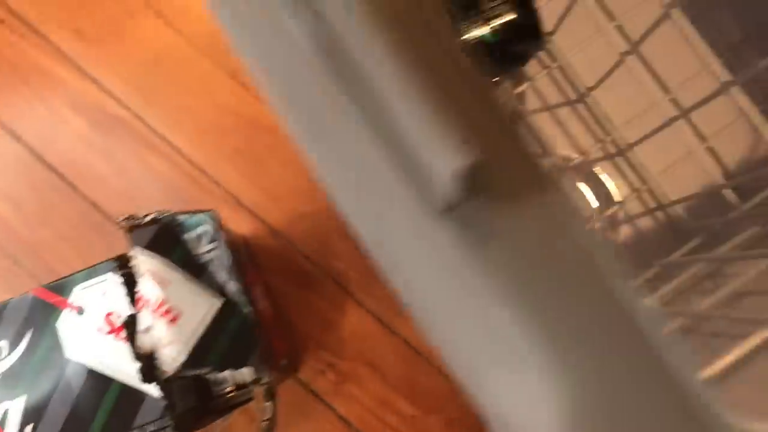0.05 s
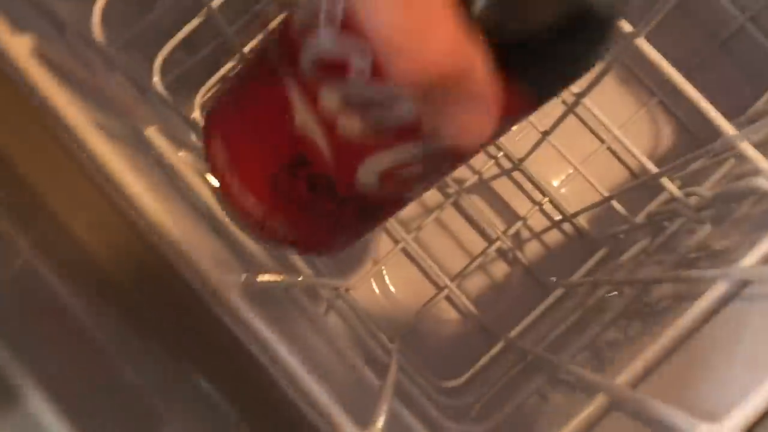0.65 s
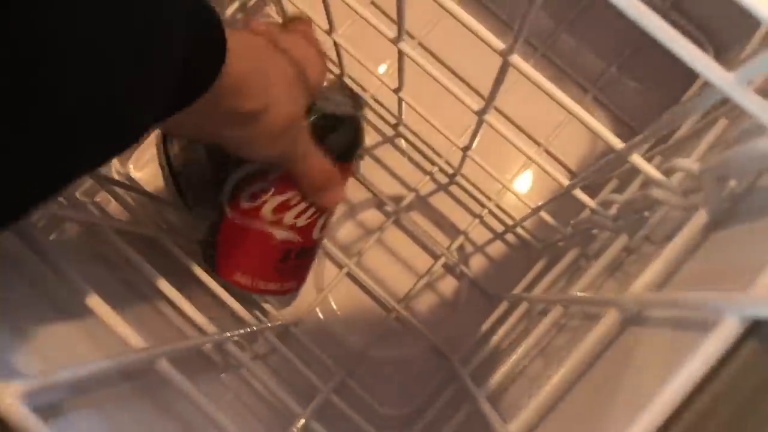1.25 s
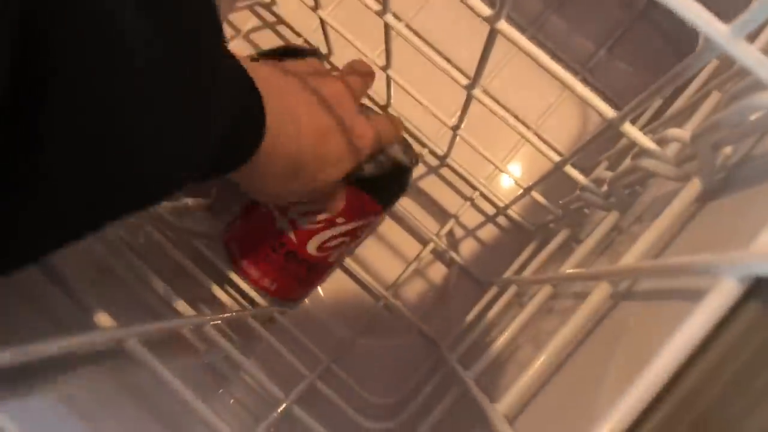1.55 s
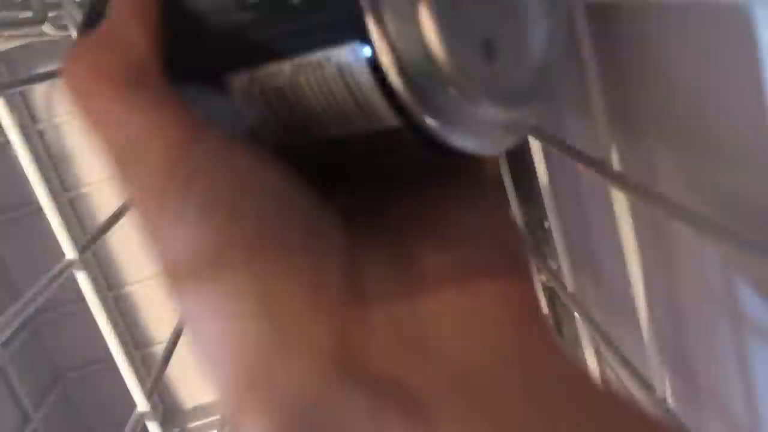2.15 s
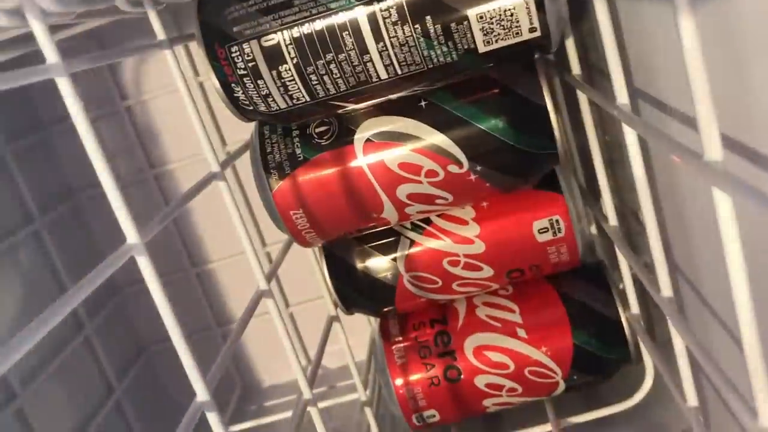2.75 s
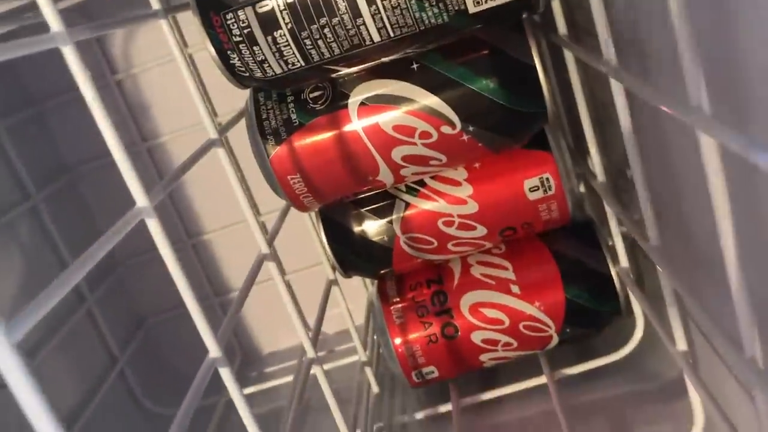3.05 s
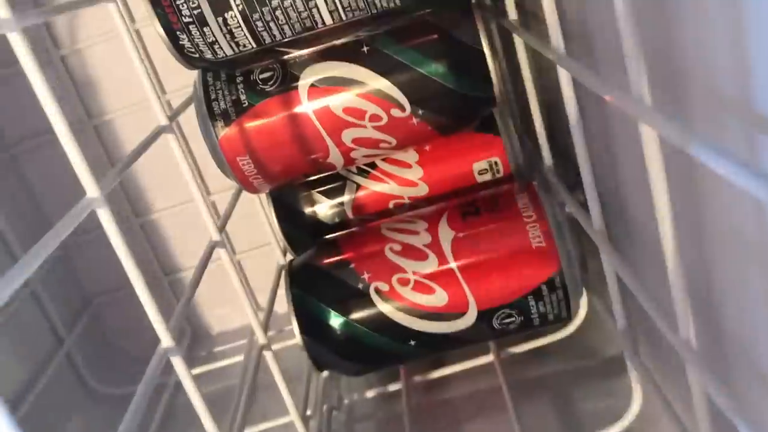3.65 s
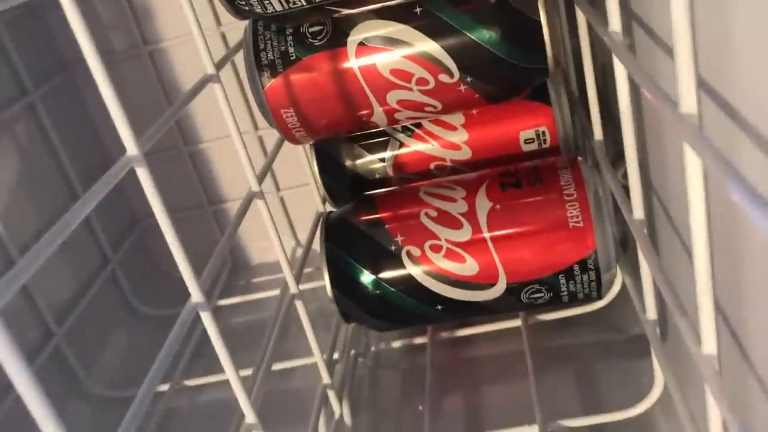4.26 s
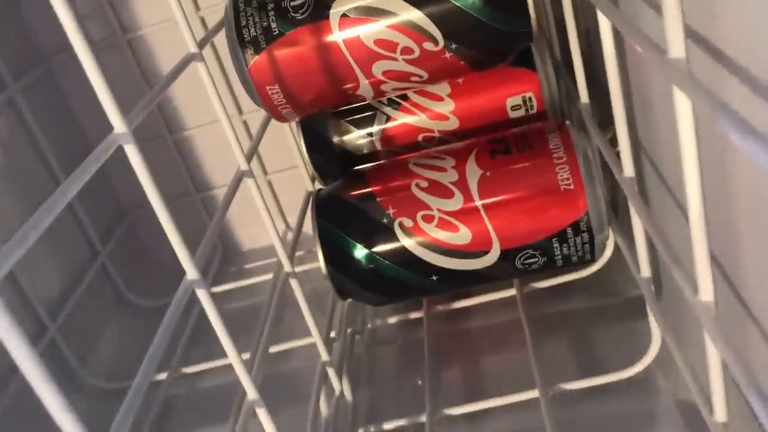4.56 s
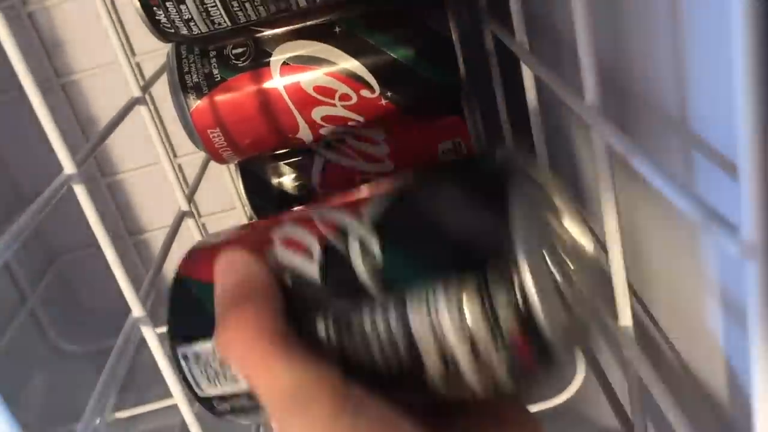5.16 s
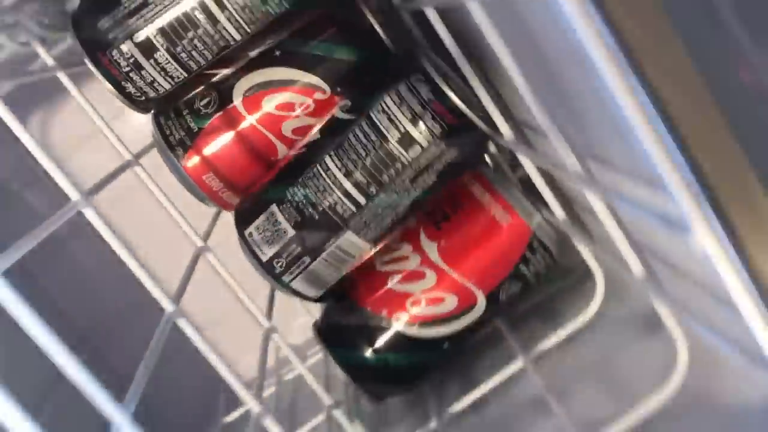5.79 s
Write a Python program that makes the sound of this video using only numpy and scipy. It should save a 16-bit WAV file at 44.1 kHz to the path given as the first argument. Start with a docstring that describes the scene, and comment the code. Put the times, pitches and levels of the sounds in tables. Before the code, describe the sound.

A drawer thumps open and rumbles with a rattling wire basket, then full cans clank in, between bumps from a cardboard carton.

```python
"""Kitchen, a phone microphone close to a fridge drawer being loaded with full soda cans.
A few faint squeaks, then the drawer thumps open and rumbles along its runners, its wire basket rattling.
An abrupt edit cut just before 2 s jumps from the rolling drawer to can loading over a faint fridge hum.
A can clatters onto the others, a hand rummages in a cardboard carton, a second can follows at 3.3 s,
then more rummaging and the last can at 5.1 s."""
import sys
import numpy as np
from scipy import signal
from scipy.fft import rfft, irfft
from scipy.io import wavfile
from scipy.ndimage import uniform_filter1d

SR = 44100
rng = np.random.default_rng(int(sys.argv[2]) if len(sys.argv) > 2 else 0)


def transcribe(u):
    """Save the signal u as a 16-bit wav file named by the first command-line argument.

    u: samples, shape (n,) or (channels, n), limited to [-1, 1]; the rate is SR.
    q: integer samples, one column per channel.
    """
    v = np.clip(np.atleast_2d(u).T, -1, 1)
    q = np.round(v * 32767).astype(np.int16)
    wavfile.write(sys.argv[1], SR, q)


N = 265702
TIME = np.arange(N) / SR


def amp(db):
    """Decibels to gain."""
    return 10 ** (np.asarray(db) / 20)


def unit(x):
    """Scales to rms 1."""
    return x / np.sqrt(np.mean(x ** 2) + 1e-20)


def read(points, hz):
    """Reads a table on a log-frequency axis."""
    f, value = np.transpose(points)
    return np.interp(np.log(hz + 1), np.log(f + 1), value)


def add(mix, s, sound):
    """Mixes a sound in at time s."""
    part = mix[max(round(s * SR), 0):][:len(sound)]
    part += sound[:len(part)]


def tint(x, colour):
    """Gives x a spectrum, at rms 1."""
    gain = amp(read(colour, np.fft.rfftfreq(len(x), 1 / SR)))
    return unit(irfft(rfft(x) * gain, len(x)))


def crackle(per_s, spread_db):
    """Friction: sparse slips of widely different sizes."""
    sizes = amp(spread_db * np.minimum(rng.exponential(1, N), 4))
    return unit(sizes * rng.choice([-1, 1], N) * (rng.random(N) < per_s / SR))


def struck(modes, spot_db, glint_db, glint_width_hz, count=14):
    """Every blow lands on another spot: the modes change weight and other high resonances glint."""
    weighted = np.array(modes, float)
    weighted[:, 2] += spot_db * rng.standard_normal(len(modes))
    hz = np.geomspace(1500, 14000, count) * rng.uniform(.92, 1.08, count)
    db = glint_db - 20 * np.log10(hz / hz[0]) + 4 * rng.standard_normal(count)
    return np.r_[weighted, np.c_[hz, np.full(count, glint_width_hz), db]]


def body(modes, direct_db, corner_hz, top_hz, size=8192):
    """Causal impulse response of resonances standing on a smooth slope."""
    hz = np.fft.rfftfreq(size, 1 / SR)
    slope = amp(direct_db) ** 2 / (1 + (hz / corner_hz) ** 2)
    peaks = sum(amp(db) ** 2 / (1 + ((hz - f) / width) ** 2) ** 2 for f, width, db in modes)
    power = (slope + peaks) / (1 + (hz / top_hz) ** 4)
    log_gain = np.log(np.r_[power, power[-2:0:-1]]) / 2
    minimum_phase = np.exp(np.conj(signal.hilbert(log_gain)))
    return np.fft.ifft(minimum_phase).real[:size // 2]


# Tops of a blow's four bands (thud, knock, clank, tick; all band lists keep this order): f/Hz
BAND_TOPS = [600, 1700, 5000, 16500]
def knocks(blows, response, low_hz, grain_db, punch, punch_s, treble_damping, thud_lag_s):
    """Each blow (t/s, band levels/dB, rise/s, knock t60/s) is a burst of tiny contacts ringing a body."""
    out, t = np.zeros(N), np.arange(SR // 3) / SR
    edges = [low_hz] + BAND_TOPS
    bands = [signal.butter(3, pair, "band", fs=SR, output="sos") for pair in zip(edges, edges[1:])]
    for s, bands_db, rise, t60 in blows:
        after, shell = np.maximum(t - rise, 0), response()
        grain = amp(grain_db * unit(uniform_filter1d(rng.standard_normal(len(t)), size=40)))
        attack = np.minimum(t / max(rise, 1e-4), 1)
        force = attack * (1 + punch * np.exp(-after / punch_s)) * grain
        for k, (band, db) in enumerate(zip(bands, bands_db)):
            dying = amp(-60 * after / t60 * treble_damping ** (k - 1))
            swell = 1 - np.exp(-t / thud_lag_s) if k == 0 else 1
            contacts = force * swell * dying * rng.standard_normal(len(t))
            ring = signal.sosfilt(band, signal.fftconvolve(contacts, shell)[:len(t)])
            add(out, s, amp(db) * ring * np.sqrt(.03 * SR / np.sum(ring ** 2)))  # level over 30 ms
    return out


def alike(rows, bands_db, rise_s, t60_s):
    """Blows that differ only in time and strength."""
    return [(s, db + np.array(bands_db), rise_s, t60_s) for s, db in rows]


# Wire, plastic and metal squeaking: t/s, f/Hz, level/dB, decay/s
SQUEAKS = [(.214, 7100, -52, .015), (.215, 2840, -56, .027), (0.313, 1080, -57.5, .055),
           (0.357, 1740, -51.5, .035), (0.404, 2900, -54, 0.043), (0.407, 1294, -46.5, .089),
           (0.938, 2630, -22.5, .027), (2.131, 7100, -36, .009)]
def squeaks():
    """Each squeak is a brief, impure tone: a narrow band of noise."""
    out = np.zeros(N)
    for s, hz, db, decay in SQUEAKS:
        t = np.arange(round(2 * decay * SR)) / SR
        tone = tint(rng.standard_normal(len(t)), [(hz * .8, -30), (hz, 0), (hz * 1.25, -30)])
        add(out, s, amp(db) * tone * np.minimum(t / 0.0049, 1) * np.exp(-(t / decay) ** 2))
    return out


def thump(s, hz, length, db):
    """A soft low push of a few cycles."""
    out, t = np.zeros(N), np.arange(round(length * SR)) / SR
    add(out, s, amp(db) * np.sin(np.pi * t / length) ** 2 * np.sin(2 * np.pi * hz * t))
    return out


# The whole tub is pushed as it lets go and near the end of its travel: t/s, f/Hz, length/s, level/dB
TUB_THUMPS = [(0.431, 150, 0.028, -16.5), (1.615, 128, 0.062, -13.5)]
def drawer():
    """The drawer thumps, rolls and rattles; the shaken tub booms more the further it is out."""
    thumps = sum(thump(*row) for row in TUB_THUMPS)
    rattle, rolling = basket(), runners()
    shaking = np.sqrt(abs(uniform_filter1d(rattle ** 2, size=3000, origin=1499)))
    overhang_db = np.interp(TIME, [.9, 1.2], [-21, -9])
    boom_colour = [(20, -31), (48, -2.5), (95, -2), (138, 11), (185, -47), (300, -48)]
    boom = amp(overhang_db) * shaking * tint(rng.standard_normal(N), boom_colour)
    return thumps + rolling + rattle + boom


ROLL_LEVEL = [(.45, -38), (.66, -40.5), (.98, -30), (1.35, -34), (1.96, -33.5)]  # the drawer gathers speed, then eases: t/s, level/dB
ROLL_COLOUR = [(30, -34.5), (60, -5), (90, -15), (135, 8.5), (200, -25), (280, -7), (400, -2.5), (720, 0.5),
               (1050, -8), (1800, -18), (2700, -23.5), (7000, -37.5), (16000, -45)]  # spectrum of the runners: f/Hz, level/dB
def runners():
    """Dense little slips on the runners merge into a rumble."""
    s, db = np.transpose(ROLL_LEVEL)
    gain = uniform_filter1d(amp(np.interp(TIME, s, db, left=-120, right=-120)), size=400)
    return amp(-2) * gain * tint(crackle(per_s=1500, spread_db=4), ROLL_COLOUR)


DRAWER_MODES = [(140, 32, 0), (260, 23, -1.5), (312, 33, 1), (466, 59, -5), (551, 15, 3), (649, 59, -0.5),
                (750, 94, 3), (976, 57, 2), (1200, 160, -3), (2433, 23, -11.5), (2716, 130, -15),
                (3214, 66, -13)]  # resonances of the drawer: f/Hz, width/Hz, level/dB
JOLTS = [(.454, -30, 3.5, 0.24), (.563, -37.5, -5, 0.46), (.752, -33.5, 3.5, 0.29),
         (.786, -26.5, 2.5, 0.36), (0.917, -20.5, 2.5, 0.35), (.941, -20, 1, 0.34), (1.059, -32, 9.5, 0.32),
         (1.099, -23.5, 1.5, 0.45), (1.139, -25, -0.5, 0.23), (1.3064, -24, 0.5, 0.26),
         (1.352, -23, -1.5, 0.061), (1.366, -26, 0.5, 0.38), (1.389, -21.5, 2, 0.32),
         (1.532, -29, -5, 0.13), (1.614, -27, -3.5, 0.24), (1.642, -25.5, -1, 0.29), (1.845, -30, -2, 0.24),
         (1.895, -34, -1.5, 0.29), (1.925, -32.5, -2, 0.22)]  # the basket jolts as it rolls: t/s, level/dB, hardness/dB, t60/s
JOLT_BANDS = [2.5, 1, -5.5, -13]  # balance of a jolt: level/dB by band
JOLT_TILT = [-0.52, -0.058, 0.86, 0.58]  # gain/dB by band for each dB of hardness
WIRE_TICKS = [(.841, -46), (.9505, -27.5), (1.1225, -37), (1.168, -61), (1.257, -54.5)]  # single wires snap against their seats: t/s, level/dB
def basket():
    """The wire basket rattles: a hard jolt trades thud for treble; single wires tick in between."""
    def response():
        modes = struck(DRAWER_MODES, spot_db=4, glint_db=-7.5, glint_width_hz=9.5)
        return body(modes, direct_db=-12, corner_hz=2550, top_hz=11300)
    rise_share = 0.012  # a long rattle also takes longer to build
    jolts = [(s, db + np.array(JOLT_BANDS) + hardness * np.array(JOLT_TILT), rise_share * t60, t60)
             for s, db, hardness, t60 in JOLTS]
    ticks = alike(WIRE_TICKS, bands_db=[-3, -9, -8, -0.5], rise_s=0.00037, t60_s=.022)
    return amp(-0.36) * knocks(jolts + ticks, response, low_hz=75, grain_db=1, punch=0.12,
                               punch_s=0.00082, treble_damping=1.35, thud_lag_s=0.00096)


HUM = [(150.7, -60), (452.2, -60.5), (759.0, -65.5)]  # partials of the fridge hum: f/Hz, level/dB
FRIDGE_AIR = [(30, -50), (90, -8), (150, -1.5), (220, -9), (450, 0), (700, -12), (1150, -12.5), (1900, -18),
              (2300, -16), (2500, -6.5), (2750, -15.5), (4500, -24), (16000, -29)]  # room tone by the open drawer: f/Hz, level/dB
def fridge():
    """A faint wavering hum in still air."""
    wander, hum = 0.53, np.zeros(N)  # cycles of phase drift in a second
    for hz, db in HUM:
        drift = wander * np.cumsum(rng.standard_normal(N)) / np.sqrt(SR)
        hum += amp(db) * np.sqrt(2) * np.sin(2 * np.pi * (hz * TIME + drift))
    return amp(-1.5) * hum + amp(-56) * tint(rng.standard_normal(N), FRIDGE_AIR)


# Can meets can: t/s, level/dB, rim/dB (high on the rim, low on the wall), contact/s
CAN_KNOCKS = [(2.1614, -26.5, 1.5, 0.0014), (2.214, -38.5, 0, 0.0021), (2.2453, -34, 2.5, 0.0017),
              (2.28, -45, -1, 0.0032), (2.319, -38, -2, 0.0058), (2.334, -30.5, 0, 0.0023),
              (2.393, -39, -1, .009), (2.41, -27.5, 7.5, 0.0028), (3.323, -34, 0, 0.0067),
              (3.362, -38.5, -1, 0.0019), (3.3856, -24.5, 2.5, 0.0022), (3.4314, -28.5, -3, 0.00082),
              (3.476, -30, 1.5, 0.0072), (3.499, -26.5, -1.5, .009), (3.525, -33, -0.5, 0.0036),
              (3.5944, -28, 4.5, 0.0022), (3.62, -39.5, -6, 0.0021), (5.122, -28.5, -3, 0.0037),
              (5.171, -36.5, -4, 0.0056), (5.185, -28, -0.5, 0.0035), (5.2224, -25, -2.5, 0.0049),
              (5.287, -32, 8.5, .007), (5.303, -31.5, -5, 0.0021), (5.327, -31, 1, 0.0029),
              (5.416, -28, -4, 0.00125), (5.477, -32.5, 0, .011), (5.521, -39.5, -7, .006),
              (5.692, -54, -5, .002)]
CAN_BANDS = [-5, -0.5, 1.5, -5]  # balance of a clink: level/dB by band
RIM_TILT = [0.19, -0.79, 0.14, 0.71]  # gain/dB by band for each dB of rim
LANDINGS = [(2.422, -31), (3.523, -28.5), (5.293, -28.5)]  # a can drops its weight on the basket: t/s, level/dB
def can_blows():
    """The rim ticks and the wall knocks; a glancing contact slides on; the can lands with a dull thud."""
    t60_s, slide = 0.082, 4.7
    clinks = [(s, db + np.array(CAN_BANDS) + rim * np.array(RIM_TILT), contact, t60_s + slide * contact)
              for s, db, rim, contact in CAN_KNOCKS]
    return clinks + alike(LANDINGS, bands_db=[-1, -8, -14, -20], rise_s=.003, t60_s=0.072)


CAN_MODES = [(480, 47, 1), (964, 180, -2), (1296, 63, -3), (1890, 47, -5), (2317, 36, -2), (3010, 195, -7),
             (3600, 56, -9.5), (4320, 78, -14), (4930, 82, -61), (5780, 170, -16), (7260, 130, -23),
             (8400, 48, -26), (9530, 90, -22), (12000, 120, -22)]  # resonances of a full can: f/Hz, width/Hz, level/dB
CAVITY_MODES = [(163, 30, -7), (283, 54, -11), (385, 36, 2)]  # low cavity resonances: f/Hz, width/Hz, level/dB
def can_clanks():
    """Full cans clank together; the liquid damps each clank quickly."""
    def response():
        modes = struck(CAN_MODES + CAVITY_MODES, spot_db=2, glint_db=-6, glint_width_hz=69)
        return body(modes, direct_db=-16.5, corner_hz=4580, top_hz=14700)
    return amp(-0.5) * knocks(can_blows(), response, low_hz=138, grain_db=1.5, punch=0.31,
                              punch_s=0.011, treble_damping=1.23, thud_lag_s=0.0049)


RING_MODES = [(482, -3.5, 0.39), (1025, -2.5, 0.25), (1120, -21, 0.29), (1340, -12.5, 1), (1980, 2, 0.056),
              (2260, 8, 0.11), (2230, -6, 0.71), (2320, -13.5, 0.86), (3740, -21, 0.22)]  # the cans and the wires under them: f/Hz, level/dB, t60/s
def can_ring():
    """A few thin modes ring on after each blow; the last can lies on top and rings more freely."""
    ring, t = np.zeros(N), np.arange(SR) / SR
    for s, (_, _, clank_db, _), rise, _ in can_blows():
        for hz, mode_db, t60 in RING_MODES:
            detune = 1 + 0.00227 * rng.standard_normal()  # no two cans are quite alike
            tone = np.sin(2 * np.pi * (hz * detune * t + rng.random()))
            add(ring, s + rise, amp(clank_db + mode_db - 10.5 - 60 * t / t60) * tone)
    last_can = amp(-45) * np.exp(-t / .12) * np.sin(2 * np.pi * 2288 * t)
    add(ring, 5.48, last_can)
    return ring


STROKES = [(2.591, 0.65, -52), (3.065, 0.073, -56.5), (3.22, 0.48, -54.5), (3.8, 0.353, -54),
           (4.09, 0.95, -54), (5.14, 0.55, -49)]  # the hand slides along board and cans: t/s, length/s, level/dB
RUB_COLOUR = [(70, -47), (170, -3), (290, -8), (470, 6), (650, -24.5), (1000, -2.5), (1600, -16.5),
              (2500, -10), (5000, -18.5), (9000, -26.5), (16000, -28)]  # spectrum of the scrape: f/Hz, level/dB
def rubbing():
    """Hand and sleeve scrape the board; the grip catches and slips, so the colour keeps changing."""
    slips = tint(crackle(per_s=2000, spread_db=3.6), RUB_COLOUR)
    spectra = signal.stft(slips, nperseg=256)[2]
    patches = uniform_filter1d(rng.standard_normal(spectra.shape), size=5, axis=0)
    patches_db = 4 * unit(uniform_filter1d(patches, size=6, axis=1))
    scrape = unit(signal.istft(spectra * amp(patches_db), nperseg=256)[1][:N])
    arches, ends_db = np.zeros(N), -10.5  # each stroke swells and sinks back
    for s, length, db in STROKES:
        add(arches, s, amp(db + ends_db * np.linspace(-1, 1, round(length * SR)) ** 2))
    return amp(8) * uniform_filter1d(arches, size=400) * scrape


CARTON_MODES = [(170, 28, -1.5), (255, 29, -4), (377, 80, -3.5), (482, 37, 2.5), (974, 144, 1.5),
                (1170, 60, -1), (1780, 95, -14), (2090, 290, -9), (3000, 100, -20.5)]  # resonances of the carton: f/Hz, width/Hz, level/dB
BUMPS = [(2.722, -8, 0.0045), (2.797, -4, 0.0018), (2.918, -0.5, .004), (3.003, -0.5, 0.0034),
         (3.069, 7, 0.00043), (3.225, -1.5, .002), (3.835, -6, 0.0024), (3.917, -1, 0.0023),
         (4.225, -4, 0.007), (4.241, 11.5, 0.00033), (4.327, 2.5, 0.0093), (4.373, -0.5, 0.0011),
         (4.404, 1.5, .004), (4.441, 21, 0.0099), (4.468, 11.5, 0.015), (4.598, 2, 0.0013),
         (4.629, -1, 0.0063), (4.798, 2, 0.0011), (4.882, -18, 0.0023), (4.933, 12.5, 0.0004)]  # cans bump inside it: t/s, force/dB over an ordinary bump, contact/s
BUMP_BANDS = [-35.5, -39, -44.5, -48.5]  # an ordinary bump: level/dB by band
BUMP_GROWTH = [0.39, 0.94, 1.07, 0.62]  # gain/dB by band for each dB of force
BOARD_TAPS = [(2.673, -48.5), (3.07, -30), (4.035, -34.5), (4.047, -37.5), (4.0615, -37.5), (4.117, -40),
              (4.142, -39), (4.159, -37), (4.18, -41.5), (4.27, -41), (4.291, -45), (4.499, -29),
              (4.934, -26.5)]  # the board catches and lets go: t/s, level/dB
def carton():
    """Cans bump in the carton: force turns a soft, long thud into a short knock. The board taps drily."""
    def response():
        modes = struck(CARTON_MODES, spot_db=4, glint_db=-17, glint_width_hz=19)
        return body(modes, direct_db=-8.5, corner_hz=2260, top_hz=12900)
    t60_s, drying = 0.19, 0.2  # drying: dB of length lost per dB of force
    bumps = [(s, np.array(BUMP_BANDS) + force * np.array(BUMP_GROWTH),
              contact, t60_s * amp(-drying * force)) for s, force, contact in BUMPS]
    taps = alike(BOARD_TAPS, bands_db=[-11, -2, -7, -21.5], rise_s=.0006, t60_s=0.027)
    knocking = knocks(bumps + taps, response, low_hz=132, grain_db=1.5, punch=0.82,
                      punch_s=0.003, treble_damping=0.82, thud_lag_s=0.0015)
    return amp(-2.5) * knocking + thump(s=4.445, hz=188, length=0.018, db=-15.5)


KITCHEN_DECAY = [(150, 0.19), (1200, 0.38), (3000, 0.31), (15000, 0.064)]  # reverberation of the kitchen: f/Hz, t60/s
def kitchen(x):
    """Close sound in front, sparse reflections from 12 ms on, each band dying at its own speed."""
    size = SR // 2
    echoes = rng.standard_normal(size) * (rng.random(size) < 3000 / SR) * (np.arange(size) > .012 * SR)
    hz, t, spectra = signal.stft(echoes, SR, nperseg=256)
    decay = amp(-60 * t / read(KITCHEN_DECAY, hz)[:, None])
    tail = signal.istft(spectra * decay, SR, nperseg=256)[1]
    return x + amp(-18.5) * signal.fftconvolve(x, tail / np.linalg.norm(tail))[:N]


OPENING_AIR = [(15, -35), (27, -8.5), (100, -4.5), (200, -10), (300, -18.5), (800, -18.5), (1800, -28),
               (3300, -28), (5100, -32.5), (5600, -26), (6300, -38), (9000, -41.5), (16000, -52)]  # room tone while the drawer opens: f/Hz, level/dB
def scene():
    """An edit cut jumps from the drawer to the loading, which has its own room tone and no deep bass."""
    cut_s = 1.957
    early = uniform_filter1d((TIME < cut_s) * 1., size=60)
    opening = kitchen(drawer()) + amp(-52.5) * tint(rng.standard_normal(N), OPENING_AIR)
    high_pass = signal.butter(2, 108, "high", fs=SR, output="sos")
    handling = signal.sosfilt(high_pass, can_clanks() + can_ring() + carton() + rubbing())
    loading = kitchen(handling) + fridge()
    return (early * opening + (1 - early) * loading + kitchen(squeaks()))[None]


def record(dry):
    """The phone rounds off the highest peaks and cuts the top of the treble."""
    ceiling, edge_hz = 0.69, 16050
    rounded = ceiling * np.tanh(dry / ceiling)
    low_pass = signal.firwin(511, edge_hz, window=("kaiser", 9), fs=SR)
    return signal.oaconvolve(rounded, low_pass[None], "same")


dry = scene()
out = record(dry)
transcribe(out)
```